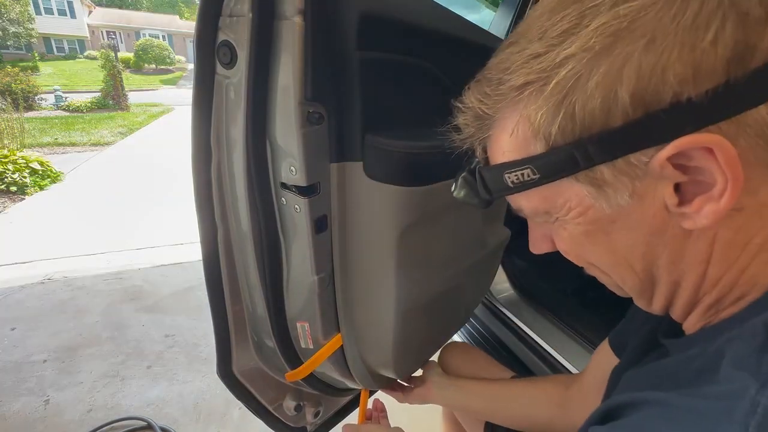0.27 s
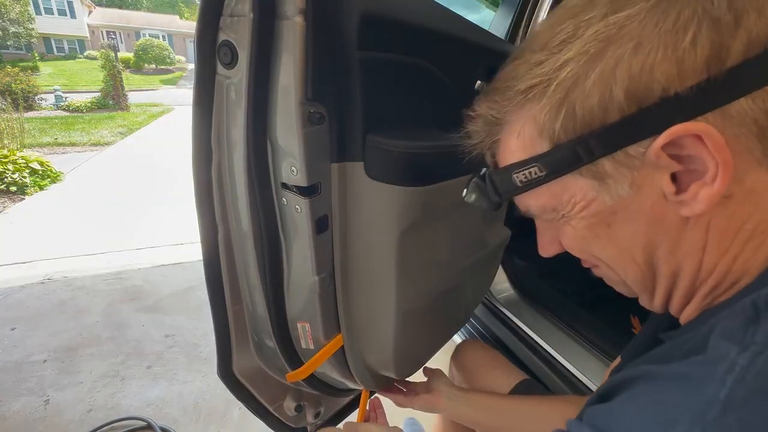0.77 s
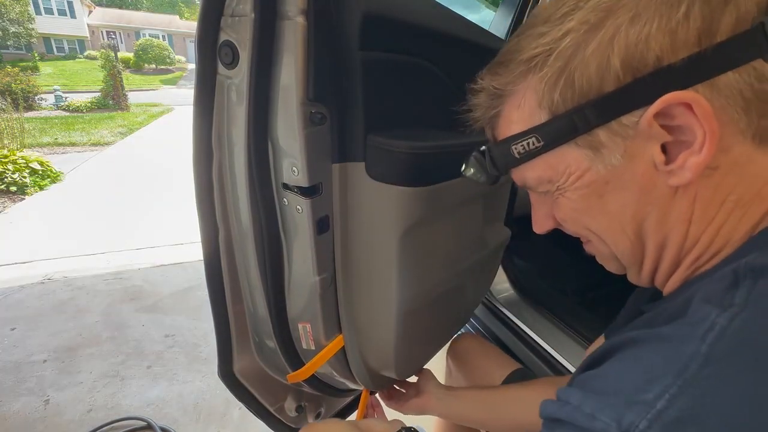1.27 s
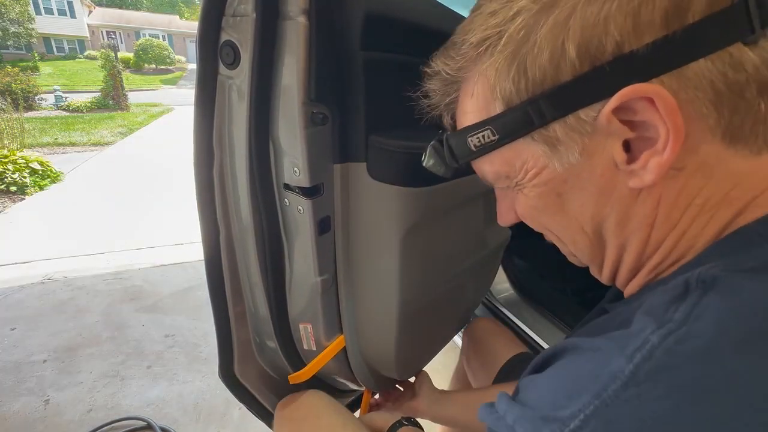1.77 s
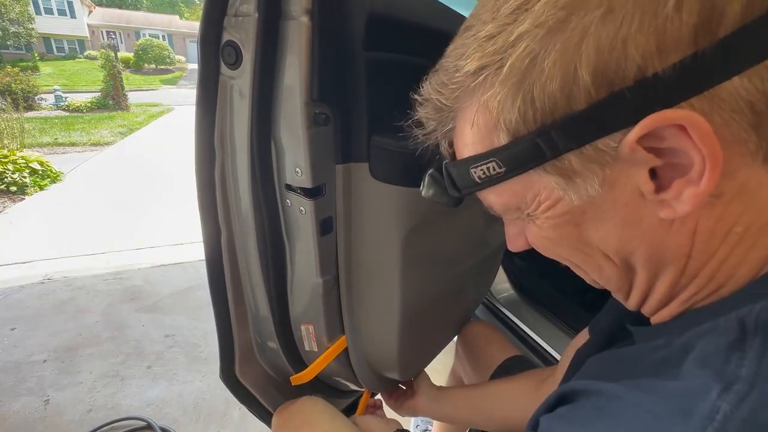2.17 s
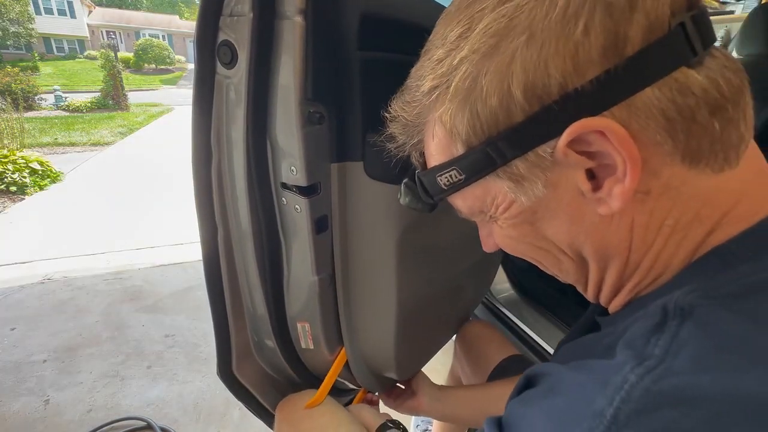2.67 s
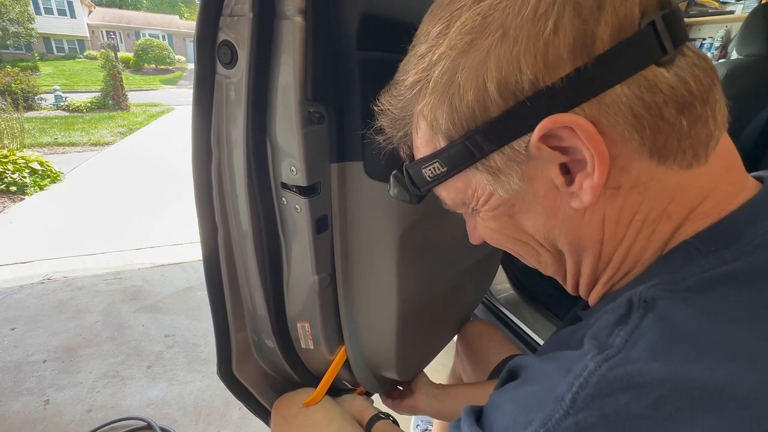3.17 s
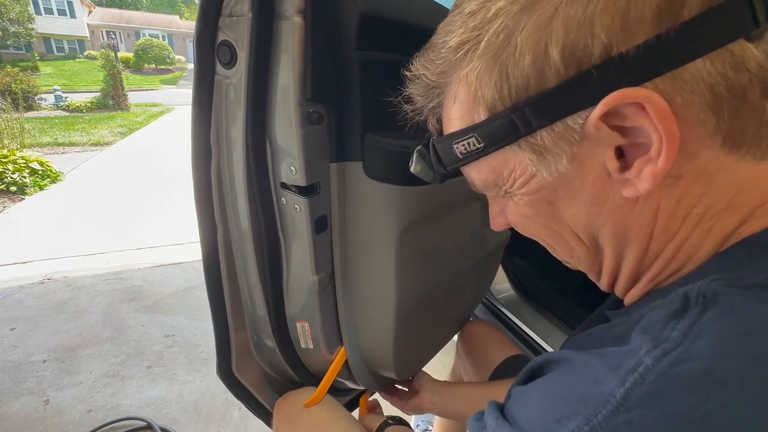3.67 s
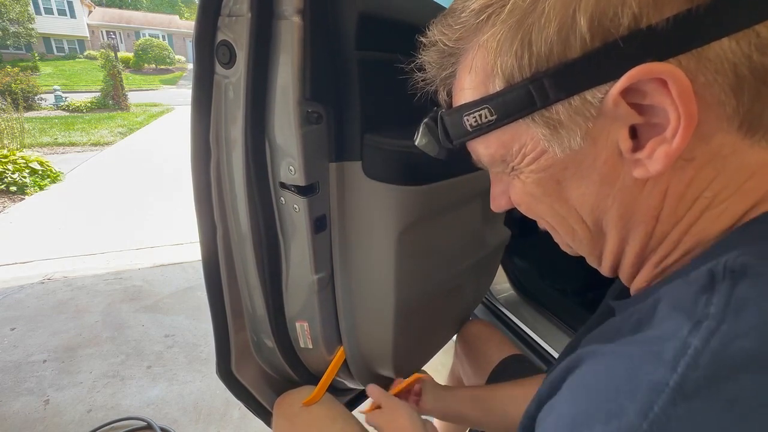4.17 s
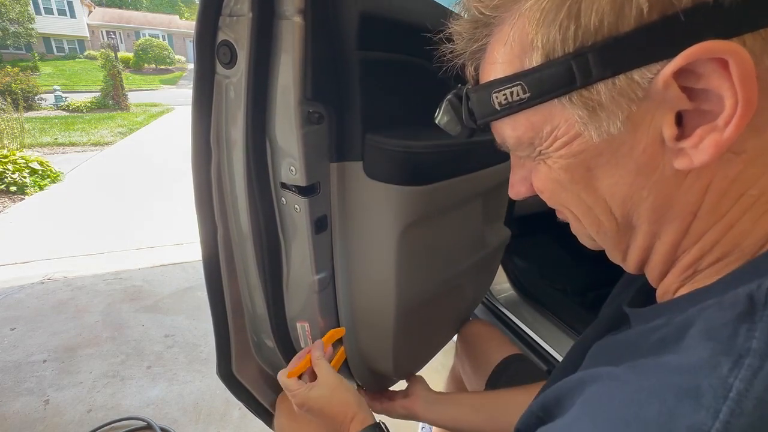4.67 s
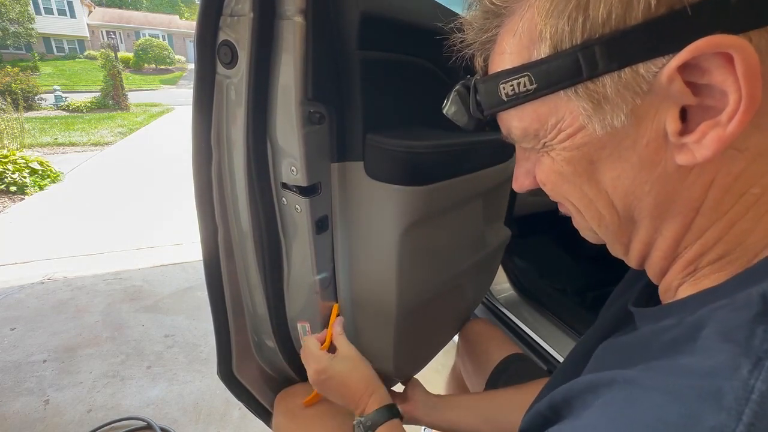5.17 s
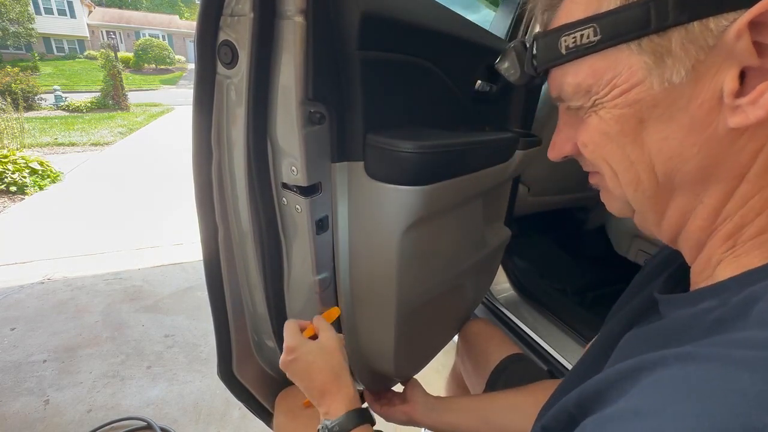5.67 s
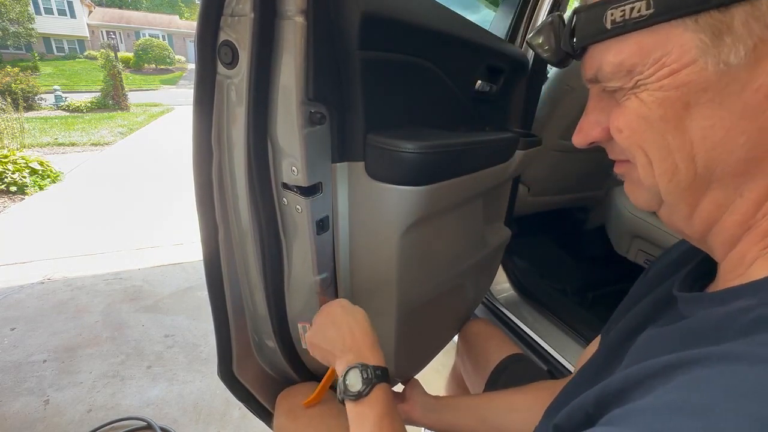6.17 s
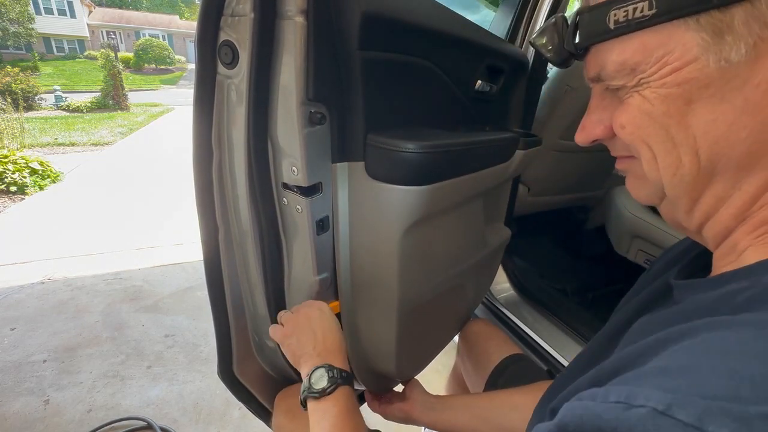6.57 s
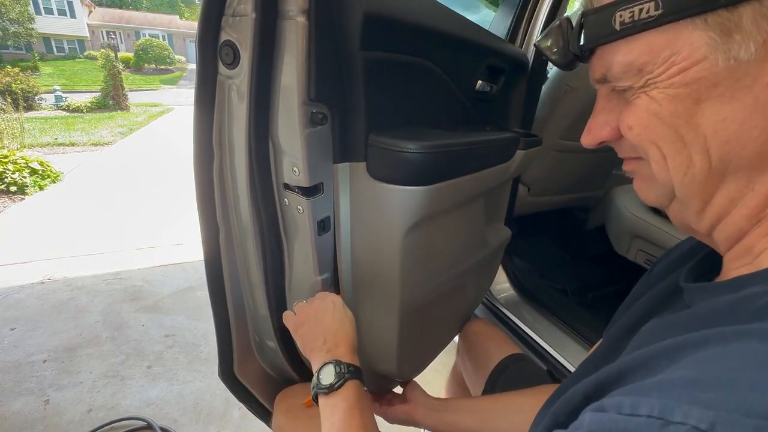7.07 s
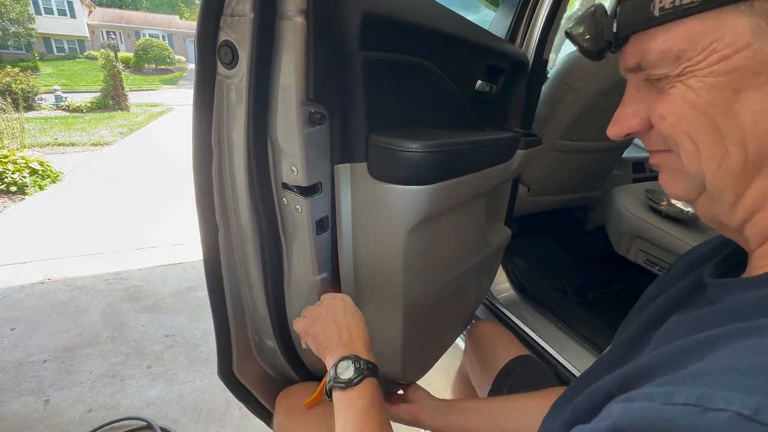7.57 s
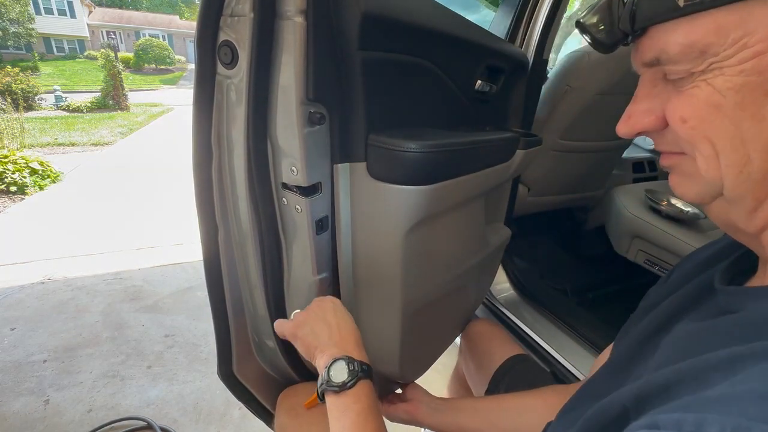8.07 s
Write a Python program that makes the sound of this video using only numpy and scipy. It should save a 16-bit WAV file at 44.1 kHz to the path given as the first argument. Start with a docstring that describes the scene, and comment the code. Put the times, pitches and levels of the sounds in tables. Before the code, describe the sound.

Close stereo microphone in an open garage. Hands and a plastic tool rub and scrape a car door panel with small ticks, over faint traffic rumble. A fastener pops sharply, followed by a near-quiet pause, then crowding knocks and creaky scrapes. A second, heavier pop thumps the hollow door, with a short garage echo, and faint ticks end it.

```python
"""Inside a garage, at an open car door: a plastic trim panel is pried off, heard at a two-port microphone.
From the start, filtered noise gives low traffic rumble and street air through the open gate, and strokes
of noise give hands, tool and sleeves rubbing the plastic. Ticks start at 0.2 s, over low shudders of the door.
One fastener pops loudly at 2.7 s, knocks crowd from 4.6 to 6.8 s, another pops at 7.2 s; faint ticks end it.
Each blow is a click with rattle, decaying sines for door and panel, and an echo of decaying noise."""
import sys
import numpy as np
from scipy import signal
from scipy.fft import rfft, irfft, next_fast_len
from scipy.io import wavfile
from scipy.ndimage import uniform_filter1d

SR = 44100
rng = np.random.default_rng(int(sys.argv[2]) if len(sys.argv) > 2 else 0)


def generate_wav(signal):
    """Clip the signal to [-1, 1] and save it as 16-bit WAV at the path in sys.argv[1]."""
    frames = np.transpose(np.atleast_2d(signal))
    scaled = np.clip(frames, -1, 1) * 32767
    pcm = np.round(scaled).astype(np.int16)
    wavfile.write(sys.argv[1], SR, pcm)


N = 367264


def amp(db):
    """dB to gain."""
    return 10 ** (np.asarray(db) / 20)


def unit(x):
    """Scaled to rms 1."""
    return x / np.sqrt(np.mean(x ** 2) + 1e-20)


def along(points, hz):
    """Read a curve of (frequency [Hz], value) points on a log frequency axis."""
    f, v = np.transpose(points)
    return np.interp(np.log(hz + 1), np.log(f + 1), v)


def curve(points):
    """One value per sample from (time [s], value) points."""
    s, v = np.transpose(points)
    return np.interp(np.arange(N) / SR, s, v)


def filtered(x, response):
    """x times a complex response of frequency."""
    m = next_fast_len(x.shape[-1] + 8192)
    return irfft(rfft(x, m) * response(np.fft.rfftfreq(m, 1 / SR)), m)[..., :x.shape[-1]]


# Likeness of the two microphone ports: (frequency [Hz], correlation [0-1])
PORT_LIKENESS = [(25, 0.86), (60, 1), (130, 0.87), (290, 0.81), (640, 0.045), (3000, 0.11), (7000, 0.047),
                 (15000, 0.31)]


def ports(pair, gain):
    """Two unrelated noises mixed to the likeness of the two microphone ports."""
    turn = lambda hz: np.arccos(np.clip(along(PORT_LIKENESS, hz), -1, 1)) / 2
    mid, side = filtered(pair, lambda hz: gain(hz) * [np.cos(turn(hz)), np.sin(turn(hz))])
    return np.array([mid + side, mid - side])


def rush(spectrum, patchy_db, grain_db):
    """Stereo noise of rms 1 with patches of random gain and sudden grains."""
    grain_gain = amp(grain_db * np.repeat(rng.exponential(size=N // 128 + 1), 128)[:N])
    z = signal.stft(grain_gain * rng.standard_normal((2, N)), nperseg=512)[2]
    # smooth in frequency, then in time
    field = uniform_filter1d(rng.standard_normal(z.shape[1:]), 8, 0)
    field = uniform_filter1d(field, 8, 1)
    pair = signal.istft(z * amp(patchy_db * unit(field)), nperseg=512)[1][:, :N]
    return unit(ports(pair, lambda hz: amp(along(spectrum, hz))))


# Distant rumble through the gate: (time [s], level [dB])
RUMBLE_LEVEL = [(0, -53), (.6, -57), (1.23, -52), (1.83, -55.5), (2.2, -51), (2.6, -52), (3.5, -55),
                (3.8, -53.5), (4.1, -60.5), (4.5, -55.5), (5.0, -54), (6.0, -55), (6.9, -52), (7.8, -55),
                (8.33, -59)]
# Noise spectra, shape only: (frequency [Hz], relative density [dB])
RUMBLE_SPECTRUM = [(12, -83.5), (20, -84.5), (38, 2), (59, 3.5), (103, 6.5), (146, -5.5), (168, -12),
                   (220, -11.5), (290, -8), (480, -120)]
AIR_SPECTRUM = [(88, -41.5), (150, 5.5), (281, -10.5), (349, -7.5), (1140, -10.5), (5170, -29.5),
                (8290, -28.5), (9510, -25.5), (11100, -48.5), (14000, -30), (16500, -69)]
AIR_DB = -62.5


def outdoors():
    """Far traffic as low noise of changing level, and the quiet air of the street as steady noise."""
    rumble = rush(RUMBLE_SPECTRUM, patchy_db=1.5, grain_db=.3)
    air = rush(AIR_SPECTRUM, patchy_db=1.2, grain_db=.3)
    # slightly stronger at the right port
    return (amp(curve(RUMBLE_LEVEL)) * rumble + amp(AIR_DB) * air) * amp([[-1.1], [1.1]])


# Broad resonances of the plastic: (frequency [Hz], width [Hz], gain [dB])
PANEL_MODES = [(104.9, 11, 7), (223, 32, 4.5), (295, 28, 7.5), (362, 17, 3), (560, 80, 3), (669, 91, 4),
               (1047, 88, 5), (1510, 360, 5.5), (1770, 160, 2.5), (2170, 220, 2.5), (2480, 180, 2),
               (3000, 430, 0), (3700, 270, 3.5), (4230, 250, 2.5), (4730, 280, 4)]


def panel(hz):
    """Gain of the panel: its broad resonances one after the other."""
    gain = 1
    for centre, width, db in PANEL_MODES:
        resonance = 1j * hz * width / (centre ** 2 - hz ** 2 + 1j * hz * width)
        gain = gain * (1 + (amp(db) - 1) * resonance)
    return gain


# Strokes of hands, tool and sleeves: (time of top [s], swell [s], fade [s], panel flexing [dB],
# scraping [dB], cloth brushing [dB], scrape brightness [0-1], cloth brightness [0-1])
RUB_STROKES = [(.118, 0.31, 0.26, -54, -66, -71, 0.33, 0.6), (.3, 0.18, 0.135, -56.5, -83, -83, 0.3, 0.1),
               (.47, 0.084, 0.19, -61, -58, -61, 0.66, 0.25), (.64, 0.12, 0.17, -57, -71, -62.5, 0.8, 0.33),
               (.744, 0.079, 0.029, -56.5, -54, -62, 0.27, 0.9),
               (0.849, 0.076, 0.074, -82, -45.5, -47, 0.78, 0.52),
               (.97, 0.13, 0.071, -52.5, -56.5, -53, 0.36, 0.36),
               (1.045, 0.18, 0.124, -46.5, -56.5, -67, 0.1, 0.3),
               (1.118, 0.05, 0.17, -53, -54, -46.5, 0.62, 0.76),
               (1.43, 0.19, 0.22, -48.5, -59, -66, 0.35, 0.5),
               (1.54, 0.039, 0.055, -47.5, -75, -85, 0.2, 0.2),
               (1.679, 0.055, 0.22, -56.5, -53, -53.5, 0.36, 0.16),
               (1.77, 0.15, 0.28, -71, -61.5, -55, 1, 0.47),
               (1.903, 0.073, 0.096, -48, -46, -48, 0.38, 0.24),
               (2.01, 0.17, 0.13, -54.5, -55, -56.5, 0.4, 0.1),
               (2.199, 0.042, 0.24, -46.5, -48, -78, 0.3, 0.6),
               (2.302, 0.12, 0.1, -43.5, -51, -67.5, 0.3, 0.5),
               (2.68, 0.064, 0.54, -53.5, -66, -71, 0.4, 0.2),
               (3.28, 0.087, 0.11, -57.5, -62, -75, 0.37, 0.26),
               (3.655, 0.071, 0.044, -53, -54.5, -60, 0.28, 0), (4.0, 0.3, 0.19, -77, -64, -65, 0.67, 0.4),
               (4.49, 0.1, 0.24, -62.5, -53.5, -55, 0.49, 0.35),
               (5.024, 0.052, 0.029, -54, -52.5, -66, 0.13, 0.3),
               (5.125, 0.022, 0.06, -59, -59.5, -73, 0.23, 0.4),
               (5.193, 0.03, 0.036, -43, -41, -57, 0.36, 0.5),
               (5.24, 0.028, 0.045, -38.5, -40, -55, 0.4, 0.79),
               (5.392, 0.011, 0.043, -42.5, -43.5, -59, 0.6, 0.1),
               (5.453, 0.088, 0.034, -37.5, -46.5, -55, 0.06, 0.5),
               (5.82, 0.15, 0.061, -51.5, -48, -60, 0.32, 0.6),
               (5.95, 0.047, 0.027, -44, -49, -57, .4, 0.2),
               (6.04, 0.061, 0.085, -49.5, -69, -89, 0.1, 0.1),
               (6.145, 0.032, 0.084, -50, -65, -87, 0.2, 0.2),
               (6.32, 0.081, 0.067, -40, -52.5, -61.5, 0.34, 0.1),
               (6.529, 0.096, 0.021, -49.5, -53.5, -61.5, 0.56, 0.8),
               (7.086, 0.015, 0.1, -49, -57, -74, 0.47, 0.5),
               (7.13, 0.068, .12, -54, -57.5, -64.5, 0.3, 0.2),
               (8.089, 0.079, 0.068, -62, -52, -65, 0.34, 0.43)]
# Noise spectra before the panel, shape only: (frequency [Hz], relative density [dB])
FLEX_SPECTRUM = [(60, -54), (110, -3), (230, 2.5), (300, -1.5), (500, -1.5), (800, -15), (1500, -43.5)]
# The same columns, one list for dull and one for bright
SCRAPE_SPECTRA = [
    [(250, -28.5), (550, 6), (900, 10.5), (1300, -2.5), (2200, -21.5), (5000, -31.5)],
    [(500, -38.5), (1200, -6.5), (1600, -3), (2200, -7.5), (3000, -15), (6000, -44)],
]
CLOTH_SPECTRA = [
    [(1500, -11), (2600, 1.5), (3500, 2), (5000, -5.5), (9500, -19), (13000, -18.5), (16500, -42)],
    [(2200, -41), (3600, 1.5), (5000, 2.5), (7000, -1.5), (9500, -12.5), (13000, -24), (16500, -46)],
]
EDGE_DB = 21.5  # fall from the top of a stroke to one swell before it or one fade after it
POINTED = 1.47  # 1 peaked, 2 rounded


def rubbing():
    """The panel flexes under hands, the tool scrapes it, sleeves brush past; each stroke swells and fades."""
    step = 64  # samples between points of the level curves
    rows, t = np.array(RUB_STROKES), np.arange(N // step + 1) * step / SR
    late = t - rows[:, :1]
    distance = np.where(late < 0, -late / rows[:, 1:2], late / rows[:, 2:3])
    shape_db = -EDGE_DB * distance ** POINTED
    power = amp(2 * np.maximum(rows[:, 3:6].T[..., None] + shape_db, -150))
    # brightness shares the power between the dull and the bright noise
    turn = rows[:, 6:].T[..., None] * np.pi / 2
    dull = power[1:] * np.cos(turn) ** 2
    bright = power[1:] * np.sin(turn) ** 2
    level = lambda p: np.interp(np.arange(N) / SR, t, np.sqrt(p.sum(axis=0)))

    total = level(power[0]) * unit(filtered(rush(FLEX_SPECTRUM, patchy_db=1.5, grain_db=.6), panel))
    for strokes, spectrum in zip((dull[0], bright[0]), SCRAPE_SPECTRA):
        scrape = rush(spectrum, patchy_db=2.2, grain_db=1.5)
        total = total + level(strokes) * unit(filtered(scrape, panel))
    for strokes, spectrum in zip((dull[1], bright[1]), CLOTH_SPECTRA):
        total = total + level(strokes) * rush(spectrum, patchy_db=1.5, grain_db=1)
    return total * amp([[.1], [2.2]])


# The whole door shudders on its hinges: (time of top [s], level [dB], rise over 20 dB [s], t60 [s])
DOOR_SHUDDERS = [(.3, -45, 0.091, 0.52), (2.764, -30, 0.029, 0.55), (5.271, -41.5, 0.17, 0.45),
                 (5.44, -47, .03, 0.45), (5.78, -53, 0.033, .5), (6.39, -42, 0.12, 0.36),
                 (6.52, -42.5, 0.021, 0.6), (7.261, -23.5, 0.024, 0.43), (7.5, -43, 0.066, .5)]
# Noise spectrum, shape only: (frequency [Hz], relative density [dB])
SHUDDER_SPECTRUM = [(15, -41.5), (40, -11), (70, 1.5), (110, 1), (170, -11.5), (300, -34), (500, -120)]


def shudder():
    """Low, uneven shaking of the pulled door: noise that rises, then dies away."""
    t, level = np.arange(N) / SR, 0
    for s, db, rise, t60 in DOOR_SHUDDERS:
        shape_db = np.where(t < s, 20 * (t - s) / rise, -60 * (t - s) / t60)
        level = level + amp(np.maximum(db + shape_db, -150))
    return level * rush(SHUDDER_SPECTRUM, patchy_db=2, grain_db=0.5) * amp([[-1.2], [1.2]])


# Life of the echo in the garage: (frequency [Hz], t60 [s])
GARAGE_T60 = [(60, 0.51), (160, 0.27), (420, 0.42), (1100, 0.45), (3000, 0.47), (8000, 0.43),
              (14000, 0.083)]
# Colour of the echo: (frequency [Hz], gain [dB])
GARAGE_COLOUR = [(60, -5), (300, -3.5), (1500, -3.5), (5000, -1), (12000, -10.5)]


def garage():
    """One stereo echo tail of random noise, 5.7 ms late; each frequency dies at its own speed."""
    hz, t, z = signal.stft(rng.standard_normal((2, SR * 3 // 5)), SR, nperseg=256)
    z = z * amp(-60 * t / along(GARAGE_T60, hz)[:, None])
    z = z / np.linalg.norm(z, axis=(0, 2))[:, None]  # equal energy at every frequency
    tail = signal.istft(z, SR, nperseg=256)[1]
    tail = ports(tail / np.linalg.norm(tail[0]), lambda hz: amp(along(GARAGE_COLOUR, hz)))
    return np.pad(tail, ((0, 0), (250, 0)))


def sweep(hz):
    """Bending waves in a thin panel: the treble arrives first, the bass sweeps in after it."""
    return np.exp(-4j * np.pi * 0.0792 * (np.sqrt(hz + 40) - hz / 300))


# Pops, ticks and knocks: (time [s], level [dB], thud [dB], knock [dB], clack [dB], edge [dB],
# left-right at 3 kHz [dB], rattle re snap [dB], rattle t60 [s], hollow note [Hz], its level [dB],
# send to the garage [dB]); thud to edge steer the colour from bass to treble, on top of a fixed curve
BLOWS = [(.2165, -47.5, 0.5, -3, -0.5, -13.5, -3, -8, 0.18, 650, -40, -5.5),
         (.227, -37.5, -4, -11, -17, -45, 3, -10.5, 0.085, 834, -30, 1),
         (.715, -44.5, -7, -13, -2, -23, -1, -8, 0.067, 1125, -64, 5.5),
         (1.0795, -48, -19, -21, -18, 0, 3, -7.5, 0.06, 4850, -38, -2),
         (1.707, -49, -9, -8, 7, -15, 0, -12, 0.027, 1050, -47, 4),
         (1.748, -34, -32, -42, -33, -10, -8, -6, 0.031, 3700, -30.5, 1),
         (1.99, -64, 2, 2, 0, -25, 0, -23, .03, 503, -40.5, 7),
         (2.013, -46.5, 2, 12, -1, -25, 0, -20, 0.026, 990, -43, -11),
         (2.1663, -58.5, 7, 7, 1, -17, -3, -7, 0.047, 665, -51, 8),
         (2.5644, -50, -14, -33, -21, -12, -1, -6.5, 0.026, 3040, -56, -3),
         (2.645, -50, -3, -5, -10, -20, 0, -23, .05, 290, -52, -5),
         (2.7347, -3, -20, -2, -4, -15, 3, -19, 0.034, 1500, -12.5, 0.5),
         (2.741, -15, -2.5, -6, 0.5, -32, -5, -12, 0.079, 560, -10, -3),
         (2.7502, -10.5, -4.5, -21, -1, -22, -12, -13, 0.13, 309, -14, -1.5),
         (2.76, -25, -2, 0, -6.5, -27, -2, -28, .05, 69.44, -32, 5),
         (2.77, -19.5, -7.5, -6.5, -0.5, -15.5, -12.5, -14, 0.19, 1520, -19.5, -14),
         (3.6357, -45, -13, -17.5, -17, -8.5, -9.5, -10.5, 0.067, 890, -58, -12),
         (3.6598, -48.5, 13, 0, -8, -6, -3.5, -36.5, 0.045, 345, -40.5, 6.5),
         (4.2955, -43.5, -4, -15.5, -16, -13, -4, -18.5, 0.16, 293, -56, -2),
         (4.615, -36.5, 5, -12, -13, -17.5, -4.5, -23.5, 0.025, 1500, -59.5, -1),
         (4.67, -45, -19, -8, -11, -5, -3, -23, 0.23, 2170, -57, 9),
         (4.7073, -23, -15.5, -12, -10.5, -16, 6, -11, 0.065, 2170, -25, -4.5),
         (4.8504, -27, -7.5, -2.5, -1.5, -17, 13, -17, 0.061, 1600, -38, 0),
         (5.011, -38, 11.5, 4, 1.5, -18, 2, -46, .038, 289, -40, 0),
         (5.1174, -51, 10, -3, 14, -8, 4, -20, 0.057, 355, -42, -2),
         (5.176, -33.5, -20, -5, -6, -14, 12, -16, 0.12, 603, -35, 2),
         (5.19, -46, -2, 8, -7, -10, 9, -5.5, 0.071, 2040, -38, -5),
         (5.218, -33.5, 7, -8, -3, -11, 4, -15, 0.1, 1760, -31, -5),
         (5.237, -44, 9, 3, -1, -20, 0, -23, 0.037, 684, -30, 6),
         (5.249, -19.5, -8, -22, -6, -18, 3, -12.5, 0.059, 1510, -30, -4.5),
         (5.28, -34, 9.5, -2, 1, -17, 0, -19.5, 0.051, 1280, -34, 6),
         (5.383, -27.5, -12, 1, -7, -26, 11, -23, 0.068, 670, -42, 3),
         (5.4195, -32, 2, -4, 2, -8, -1, -22, 0.062, 526, -35, 3),
         (5.438, -35.5, 2, -11, 3, -14, 5, -26, 0.033, 282, -34, 14),
         (5.448, -25.5, -5, -13, -17, -7, 7, -25, .042, 3800, -40, -18),
         (5.457, -44, 7, -8, -2, -18, 5, -29, .03, 268, -43, 7),
         (5.4815, -18, -5, -5, -3.5, -9.5, 5, -11.5, 0.05, 640, -36, -5.5),
         (5.6552, -45.5, 22.5, 14.5, 3.5, -33, 5, -31, 0.053, 310, -46, 3),
         (5.749, -15.5, -6, -7.5, -6, -9.5, 2, -16.5, 0.082, 638, -24.5, -3.5),
         (5.848, -31, -5, 4.5, -0.5, -7.5, -2, -17.5, 0.042, 627, -26.5, 9),
         (5.864, -41, 9, 2, 2, -17, 0, -27, .05, 250.4, -32.5, 5.5),
         (5.9, -27.5, -2, -1.5, 1.5, -8.5, 3, -12.5, 0.12, 368, -25, -8.5),
         (5.922, -45, -3, -3, 9, -18.5, 3, -17, 0.04, 302, -25.5, 7.5),
         (6.145, -57, 17.5, -2, 2, -29, 8, -7.5, 0.054, 260, -47, 0.5),
         (6.2837, -57.5, 16, 18, 8.5, -19, 7, -17.5, 0.086, 520, -35, 10),
         (6.436, -47, 3, -6, 7, -24, .5, -26, .08, 290, -41, -4),
         (6.479, -31, -10, -13, -2, -16, 0, -18.5, 0.18, 1450, -35, -2.5),
         (6.515, -34, 1, -5.5, 1, -17, 4, -23, .046, 584, -38, -3.5),
         (6.6192, -19, -10, -14.5, -13, -15.5, 0, -12, 0.036, 4100, -34, -0.5),
         (6.6644, -21, -9, -11.5, -9.5, -5, 1, -12, 0.061, 2120, -25.5, -4.5),
         (6.7663, -37, 6.5, -12, 2, -9, -3, -23, 0.021, 337, -38.5, 2.5),
         (6.8491, -44.5, 1, -6.5, 2, -19, 4, -3.5, 0.033, 690, -39, -2.5),
         (7.0738, -55.5, 25, 4, -5, -23, 4, -22, 0.03, 388, -39.5, -3),
         (7.2355, -40, 10, 6, 1, -9, 3, -4, 0.041, 310, -31, -4),
         (7.2456, 0, 1, -15, 0, -14.5, 7, -32.5, 0.22, 325, -4.5, -3),
         (7.251, -24, 8, 4, -1, -25.5, 0.5, -33, .05, 75, -21.5, -6),
         (7.2605, -17, 10, 1, 6, -25, 12, -36, .05, 275, -9.5, -14),
         (7.2785, -1.5, -7.5, -13, -1.5, -29, -3, -39.5, 0.093, 694, -24, -10.5),
         (7.295, -17.5, 12, 2, 4, -16, -3, -30, 0.077, 660, -17, -5.5),
         (7.3095, -19, -2, 3, 10, -12, -13, -35, .02, 696, -12, 1),
         (7.325, -43, -10, -1, -2, -1, 4, -35, .05, 726, -17.5, 2),
         (7.49, -41.5, 9, 1, 9, -23.5, -9, -28, 0.082, 1186, -41, 6),
         (7.5905, -45, -8, -21, -14.5, -20, 0, -14.5, 0.12, 2740, -51, 0.5),
         (8.2153, -41, -6, -42, -21, -8, -5, -14, 0.042, 3100, -52.5, 5.5),
         (8.285, -51, -23.5, -18.5, -14, -9, -9, -16, .03, 3960, -45.5, 9),
         (8.2905, -48, -27, -14, 3, -14, -11.5, -14, 0.035, 1030, -34, 2)]
# Modes of the door steel: (frequency [Hz], level re BOOM_DB [dB], t60 [s])
DOOR_MODES = [(62, -2, .2), (97, -3, .25), (304, -2, .18), (360, -6, .1), (565, -5, .15), (665, -3, .3),
              (740, -8, .25), (1012, -13, .3), (1095, -10, .3), (1710, -14, .25), (271, -15, .8),
              (275, -20, .7)]
# Sound that bounces back between panel and door: (time [s], share at low frequencies [0-1])
SLOT_SHARE = [(4.6, 0.04), (4.7, 0.17), (5.3, 0.06), (5.48, 0.4), (5.75, 0), (6.0, 0)]
# Life of the hollow note of the struck spot: (frequency [Hz], t60 [s])
NOTE_LIFE = [(70, .3), (200, .08), (700, .025), (2000, .018), (5000, .008)]
GAP_HZ = 1120  # spacing of the slot's resonances
CRUNCH_DB = 5  # unevenness of the rattle from one small contact to the next
BOOM_DB = -54.5
THROWN_CLICK, THROWN_RATTLE, THROWN_NOTE = 0.57, 0.81, 0.47  # shares that reach the garage
NOTE_RISE_S = 0.00028
NOTE_WAVER = 0.36  # unevenness of a note's size as it dies


def waver(length, depth):
    """Slightly uneven gain around 1, unlike at each port."""
    return 1 + depth * unit(uniform_filter1d(rng.standard_normal((2, length)), size=200))


def hits():
    """Each slip snaps, rattles the panel, booms in the door and echoes in the garage."""
    out, t = np.zeros((2, N + 2 * SR)), np.arange(SR * 3 // 5) / SR
    size, lead = len(t), 256  # samples kept free ahead of the blow
    since = np.maximum(t - lead / SR, 0)
    impulse = np.arange(size) == lead
    tails = [garage() for _ in range(12)]
    for k, (s, db, thud_db, knock_db, clack_db, edge_db, pan_db, rattle_db, t60,
            note_hz, note_db, echo_db) in enumerate(BLOWS):
        # one sharp click, then a few ms of small slips at nearby edges
        chosen = rng.random(size) < .25
        slips = 0.36 * amp(-60 * since / 0.011) * (since > 0) * chosen * rng.standard_normal((2, size))
        snap = 0.62 * impulse + ports(slips, lambda hz: 1)
        shake = amp(rattle_db - 60 * since / t60) * (1 - np.exp(-since / 0.0014))
        contacts_db = CRUNCH_DB * np.repeat(rng.standard_normal(size // 96 + 1), 96)[:size]
        rattle = ports(shake * unit(amp(contacts_db)) * rng.standard_normal((2, size)), lambda hz: 1)
        boom = 0
        for hz, level_db, decay in DOOR_MODES:
            mode_db = BOOM_DB + level_db + rng.normal(0, 0.93) - 60 * since / decay
            boom = boom + amp(mode_db) * np.sin(2 * np.pi * hz * since)

        colour = [(25, thud_db - 1.0), (80, thud_db + 18.5), (280, thud_db + 23.5),
                  (600, knock_db + 29.5), (1200, clack_db + 19.0), (2300, 10.1), (3300, 6.2),
                  (5500, 0.74 * edge_db + 7.5), (8500, edge_db + 14.5), (12500, edge_db + 1.0),
                  (16500, edge_db - 9.0)]
        # sound bounces to and fro in the slot: evenly spaced resonances
        bounced = np.interp(s, *np.transpose(SLOT_SHARE))
        share = lambda hz: bounced / (1 + (hz / 9000) ** 2)
        slot = lambda hz: np.sqrt(1 - share(hz) ** 2) / (1 - share(hz) * np.exp(-2j * np.pi * hz / GAP_HZ))
        response = lambda hz: amp(db + along(colour, hz)) * sweep(hz) * slot(hz) * panel(hz)

        # the panel throws part bare blow, part shaking into the garage
        shaken = snap + rattle + boom
        click = np.linalg.norm(shaken[0]) * impulse
        sent = THROWN_CLICK * click + THROWN_RATTLE * shaken[0]
        *direct, thrown = filtered(np.vstack([shaken, sent]), response)

        # the struck spot of the panel sounds its own short hollow note
        fade = amp(note_db - 60 * since / along(NOTE_LIFE, note_hz))
        ring = fade * (1 - np.exp(-since / NOTE_RISE_S)) * np.sin(2 * np.pi * note_hz * since)
        note = filtered(waver(size, NOTE_WAVER) * ring, sweep)
        direct = direct + note
        thrown = amp(echo_db) * (thrown + THROWN_NOTE * note[0])
        wet = signal.fftconvolve(thrown[None], tails[k % len(tails)], axes=1)

        # the microphone body shades each port: left-right difference by frequency
        lean = [(300, -0.5), (900, 0.87), (3000, pan_db), (9000, pan_db / 4)]
        at = round(s * SR) - lead
        out[:, at:at + size] += filtered(direct, lambda hz: amp(along(lean, hz) * [[.5], [-.5]]))
        out[:, at:at + wet.shape[1]] += wet * amp([[-.8], [.8]])
    return out[:, :N]


# Further notes of the struck spots, and the door's long hum at 7.49 s: (time [s], frequency [Hz], # level [dB],
# t60 [s], left-right [dB])
SPOT_NOTES = [(0.22, 1007, -36, 0.056, 0), (.217, 2300, -40, .02, 0), (0.23, 1027, -37, 0.071, -2),
              (0.23, 2557, -36, 0.014, 5), (.232, 1900, -43, .02, 0), (2.734, 2680, -14.5, 0.019, -1),
              (2.739, 4300, -24, 0.012, 1), (2.753, 4600, -24, .02, -1.5), (2.7365, 900, -9.5, .012, 0.5),
              (2.7385, 620, -11, .02, 1), (2.772, 4250, -29, .05, -3), (2.8, 4400, -33.5, 0.045, 0.5),
              (2.744, 1035, -16, 0.045, -2), (2.752, 2440, -22, .03, -3), (2.77, 1750, -19, .04, -3.5),
              (2.788, 1350, -23, .04, -3.5), (2.8, 920, -25, .04, -1.5), (4.72, 1460, -33, 0.034, 5),
              (4.708, 3150, -30, 0.016, 3), (4.851, 2130, -33, 0.017, 5), (4.86, 1134, -40, 0.037, 3),
              (4.881, 1670, -37.5, .04, -3), (5.179, 1790, -39, 0.037, 4), (5.185, 1983, -35, .02, 4),
              (5.192, 2150, -40, 0.032, 4), (5.183, 990, -33, 0.034, 2), (5.384, 1650, -35, .02, 8),
              (5.439, 602, -31, .03, 0), (5.219, 2370, -39.5, .025, 3), (5.25, 1837, -24.5, 0.036, 0),
              (5.249, 330, -21, 0.049, 0), (5.278, 2440, -41, .025, 0), (5.418, 1586, -36, .03, 0),
              (5.418, 2170, -37, .03, 2), (5.438, 4000, -35, .01, 3), (5.448, 4680, -37, 0.011, 3),
              (5.448, 2400, -44, .01, 3), (5.455, 4000, -39, .01, 4.5), (5.482, 2220, -27.5, 0.056, 4),
              (5.4825, 1095, -21, 0.081, 1), (5.484, 667, -20.5, .07, 1), (5.483, 3360, -34.5, 0.058, 0),
              (5.495, 1090, -29, 0.051, 0.5), (5.488, 500, -24.5, 0.052, 0), (5.751, 510, -18, 0.014, 0),
              (5.751, 3400, -28, .012, 2), (5.77, 3700, -37.5, .04, 1.5), (5.248, 2100, -29, .015, 0),
              (5.27, 1600, -32, .04, -1.5), (5.75, 1540, -31, 0.035, -0.5), (5.75, 2270, -25, 0.024, 3),
              (5.758, 1100, -27, 0.042, 0.5), (5.855, 250, -29, .1, 0), (5.85, 3500, -40, .03, 0),
              (5.85, 1900, -40, .03, 0), (5.903, 1120, -27.5, 0.063, 0), (5.902, 2110, -33, 0.018, 0),
              (6.665, 1503, -31.5, 0.046, 0.5), (6.666, 640, -23, 0.041, -3.5), (7.262, 93, -16, .1, -2.5),
              (7.279, 1450, -13, .012, 0), (7.2787, 700, 1, 0.02, -2.5), (7.309, 670, -14, 0.028, 0),
              (7.247, 420, -8, .02, 0), (7.258, 1020, -18, 0.033, 0), (7.336, 720, -22.5, 0.052, 0.5),
              (7.49, 271, -43.5, .6, -1)]
OVERTONE_ECHO_DB = -7  # garage echo of these notes


def overtones():
    """Short uneven rings of the panel, and one long hum of the door, as decaying sines, each with its echo."""
    out, t = np.zeros((2, N + 2 * SR)), np.arange(SR * 3 // 5) / SR
    for s, hz, db, t60, pan_db in SPOT_NOTES:
        fade = amp(db - 60 * t / t60) * (1 - np.exp(-t * hz / 1.7))
        # long notes waver less
        ring = waver(len(t), NOTE_WAVER * min(1, .05 / t60)) * fade * np.sin(2 * np.pi * hz * t)
        wet = signal.fftconvolve(ring[:1], garage(), axes=1)
        at = round(s * SR)
        out[:, at:at + len(t)] += ring * amp(pan_db * np.array([[.5], [-.5]]))
        out[:, at:at + wet.shape[1]] += amp(OVERTONE_ECHO_DB) * wet
    return out[:, :N]


def scene():
    """All sources at the microphone."""
    return outdoors() + rubbing() + shudder() + hits() + overtones()


CEILING = .92  # full scale is 1
TOP_HZ = 16600


def record(dry):
    """The microphone chain rounds off the loudest peaks, then keeps nothing above its band limit."""
    rounded = dry / (1 + np.abs(dry / CEILING) ** 4) ** .25
    return filtered(rounded, lambda hz: hz < TOP_HZ)


dry = scene()
out = record(dry)
generate_wav(out)
```